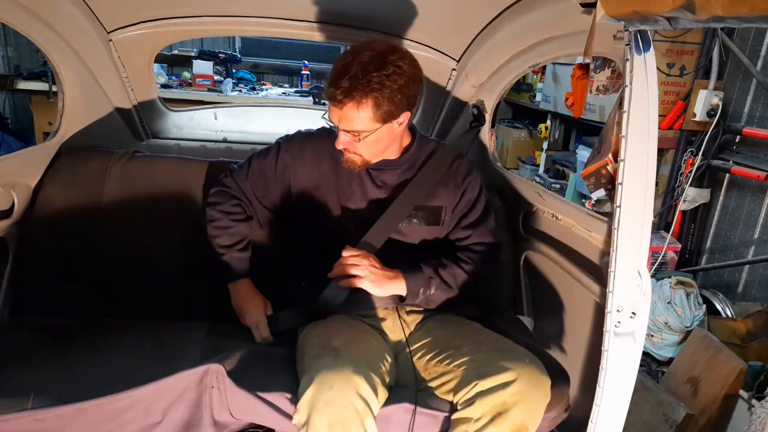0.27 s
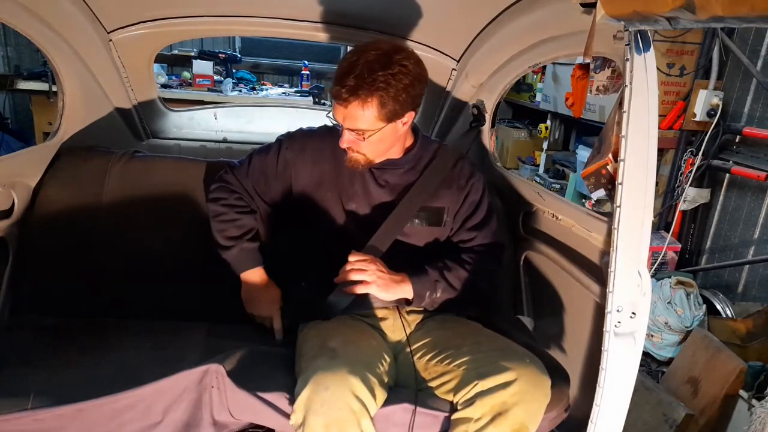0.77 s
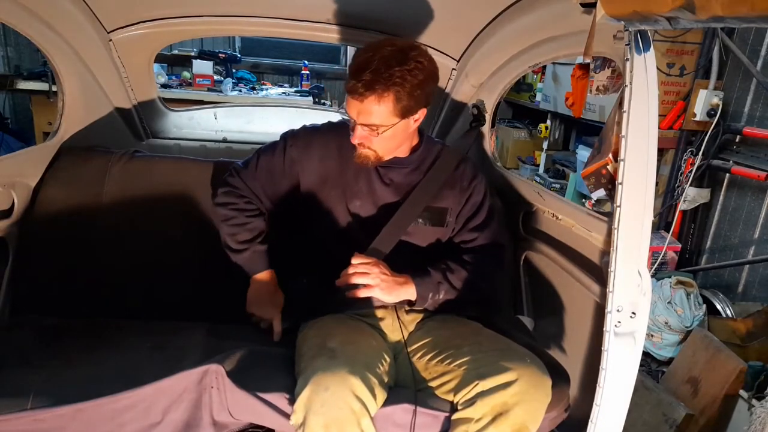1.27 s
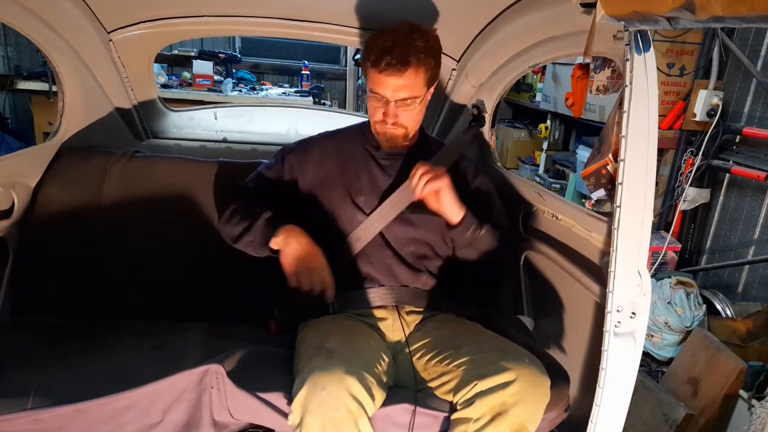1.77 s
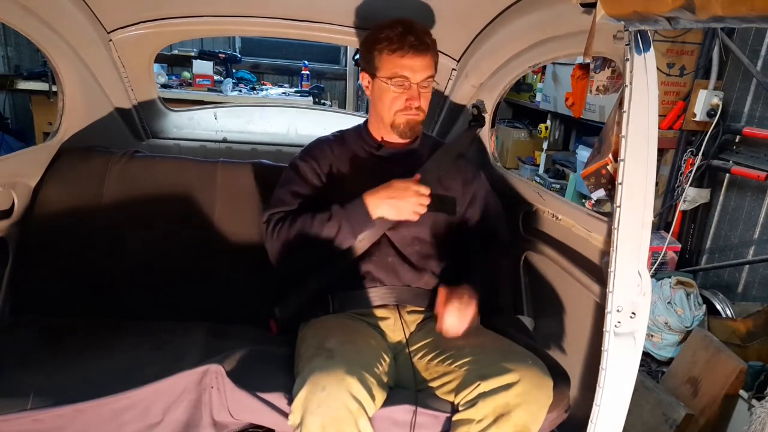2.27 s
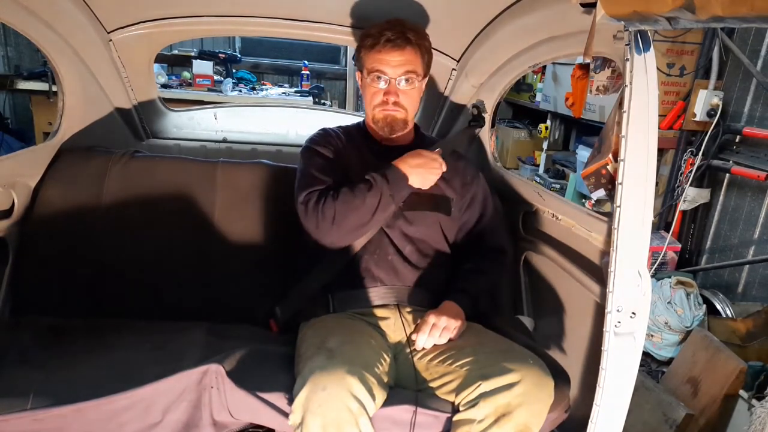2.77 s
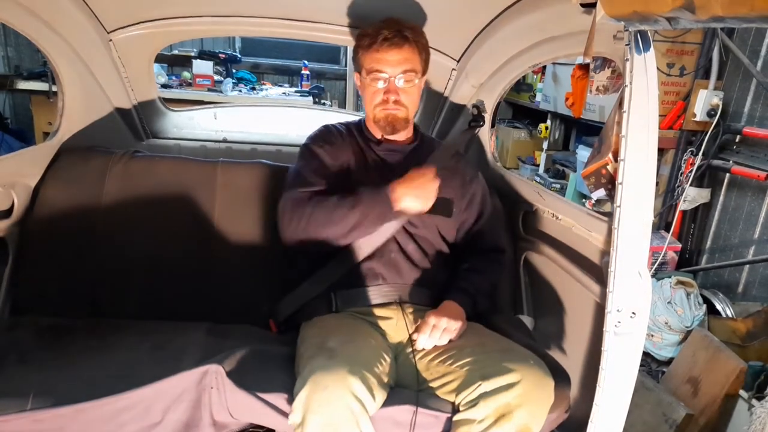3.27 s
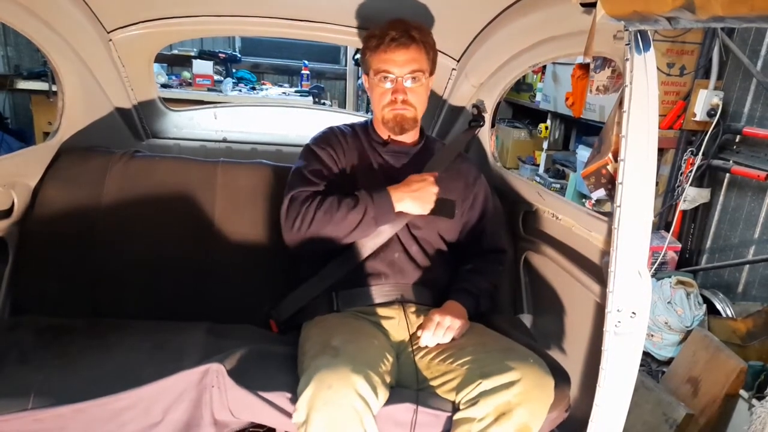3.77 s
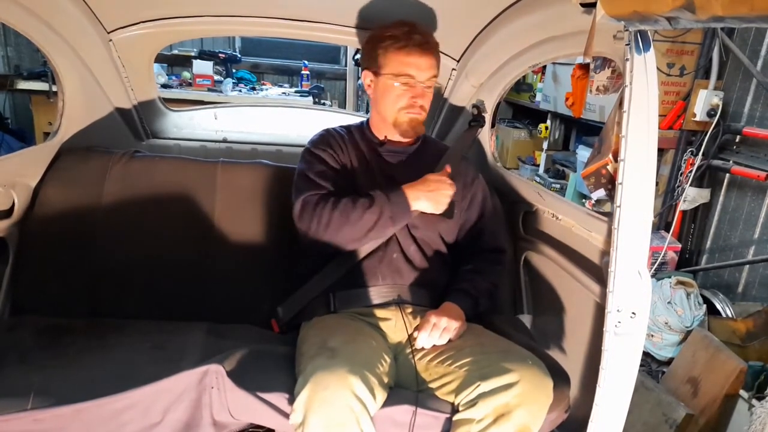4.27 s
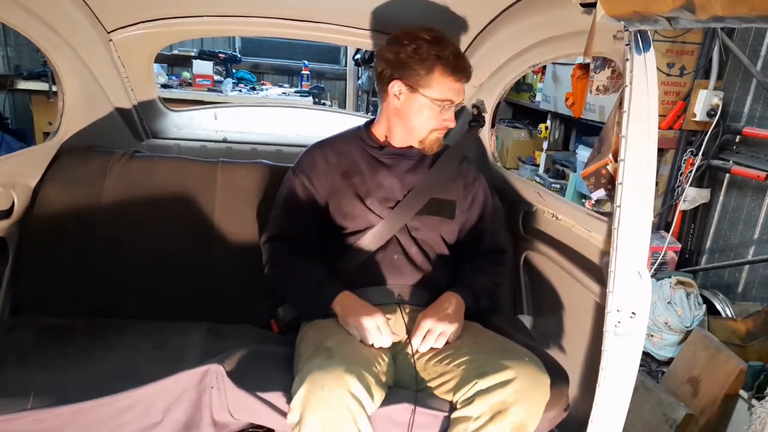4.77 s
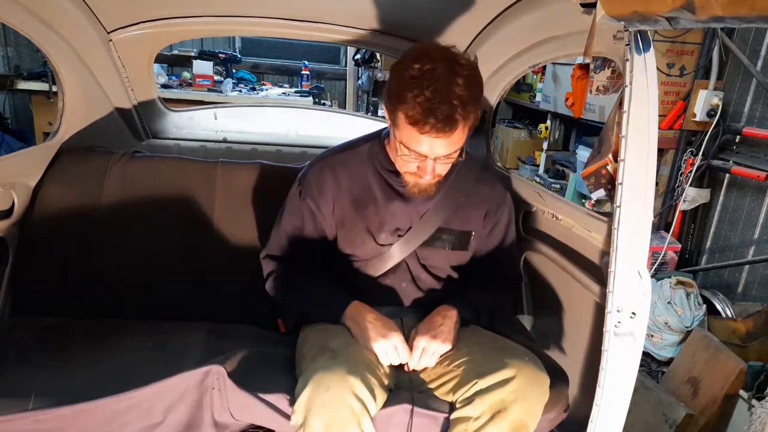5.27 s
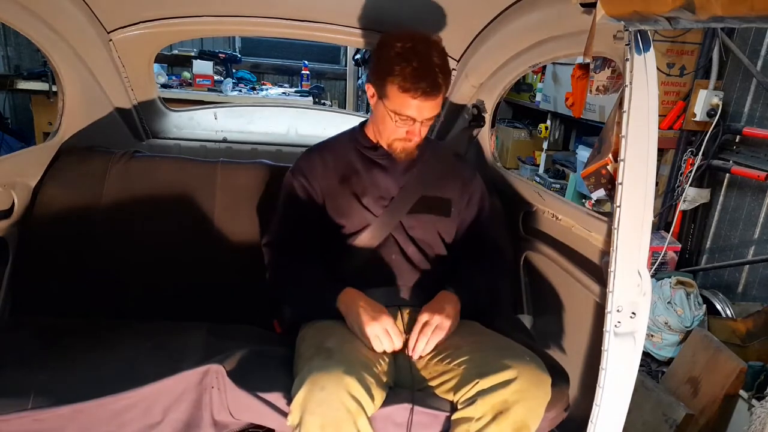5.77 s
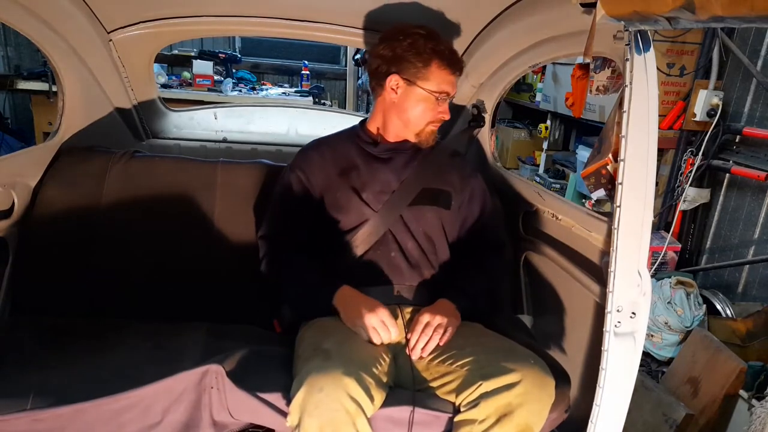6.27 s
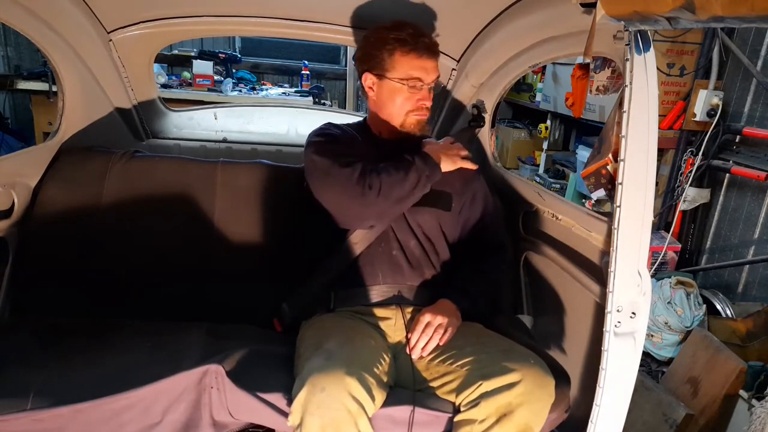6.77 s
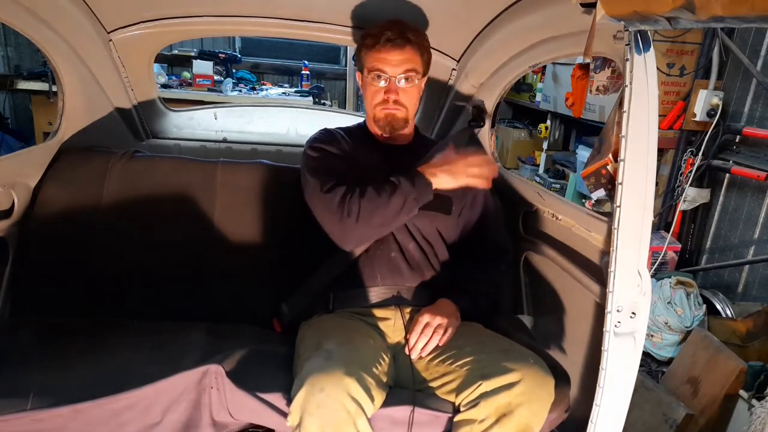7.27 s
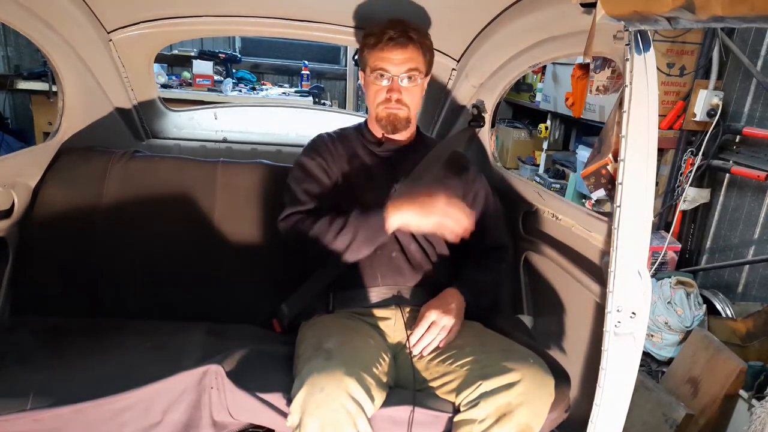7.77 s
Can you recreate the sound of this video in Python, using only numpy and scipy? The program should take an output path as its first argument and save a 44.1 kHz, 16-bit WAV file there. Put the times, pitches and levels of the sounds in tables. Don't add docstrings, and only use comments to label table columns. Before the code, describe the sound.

Seat belt latches with a click, webbing rasps, three hard reel locks clatter in a boomy cabin, soft rustling follows, then one hand slap.

```python
import sys
import numpy as np
from scipy import signal
from scipy.io import wavfile
from scipy.ndimage import uniform_filter1d

SR = 44100
rng = np.random.default_rng(int(sys.argv[2]) if len(sys.argv) > 2 else 0)


def volts(x):
    e = np.asarray(x, float) / 20
    return 10 ** e


def materialize(psi):
    bounded = np.clip(np.atleast_2d(psi).T, -1, 1)
    quanta = np.round(bounded * 32767).astype(np.int16)
    wavfile.write(sys.argv[1], SR, quanta)


N = 353549
CONTROL_STEP = 40

# band_hz, t60_s
CABIN_T60 = [(60, 1), (160, 0.71), (420, 0.54), (1100, 0.33), (2910, 0.27), (7680, 0.22), (14000, 0.12)]


def in_time(rows):
    s, *columns = np.transpose(rows)
    return [np.interp(np.arange(N) / SR, s, column) for column in columns]


def at_hz(points, hz):
    table_hz, values = np.transpose(points)
    return np.interp(np.log(hz), np.log(table_hz), values)


def rms_one(x):
    return x / np.sqrt(np.mean(x ** 2) + 1e-20)


def drift(rate_hz):
    r = np.exp(-2 * np.pi * rate_hz * CONTROL_STEP / SR)
    noise = rng.standard_normal(N // CONTROL_STEP + 2002)
    slow = signal.lfilter([1], [1, -2 * r, r * r], noise)[2000:]
    return np.interp(np.arange(N) / CONTROL_STEP, np.arange(len(slow)), rms_one(slow))


def ring(x, hz, t60_s):
    r, w = volts(-60 / (t60_s * SR)), 2 * np.pi * hz / SR
    return signal.lfilter([0, np.sin(w)], [1, -2 * r * np.cos(w), r * r], x + 1e-18)


def grains(per_s, spread_db):
    size_db = spread_db * np.minimum(rng.exponential(1, N), 5)
    sizes = volts(size_db) * rng.choice([-1, 1], N)
    return rms_one(sizes * (rng.random(N) < per_s / SR))


def bank(sources):
    edges_hz = 30 * 2 ** np.arange(0, 9.1, 1 / 3)
    for k, (low_hz, high_hz) in enumerate(zip(edges_hz, edges_hz[1:])):
        sos = signal.butter(2, [low_hz, high_hz], "band", fs=SR, output="sos")
        yield np.sqrt(low_hz * high_hz), signal.sosfilt(sos, sources[k % 2])


def shake(times_s, levels_db, lengths_s):
    rise_s = 0.0018
    power = np.zeros(N)
    for s, level_db, length_s in zip(times_s, levels_db, lengths_s):
        span_s = max(length_s, 0.002)
        u = np.arange(int(3 * span_s * SR)) / (span_s * SR)
        burst = volts(2 * level_db) * np.minimum(u * length_s / rise_s, 1) * np.exp(-u * u)
        i = round(s * SR)
        power[i:i + len(u)] += burst[:N - i]
    return power


def dying(power, t60_s, near):
    r = volts(-120 / (t60_s * SR))
    return np.sqrt(near * power + signal.lfilter([45 / SR], [1, -r], power + 1e-30))


def reel():
    # start_s, rattle_peak_db, boom_re_rattle_db, shake_length_s
    yanks = [
        (3.2195, -32, 6, 0.02),
        (3.229, -23, 4, 0.023),
        (3.594, -42, 10, 0.016),
        (3.6087, -26, 8.5, 0.017),
        (3.958, -35.5, -3, 0.025),
        (3.9719, -23.5, 10, 0.015),
    ]
    yank_bright_db = [-0.5, 0.7, -0.5, 0.7, -6, -3]
    # start_s, peak_db, boom_re_rattle_db, bright_re_rattle_db, run_on_db
    rattles = [(0.3, -58, 5, -65, 5), (0.915, -66, 31, -45, -2.5), (0.99, -49.5, 9.5, -73, 0),
               (1.108, -37, -1, -45, -12), (1.119, -26, -2, -52, -21), (1.3456, -45.5, 5, -70, 3),
               (2.833, -46.5, -6, -28, 6.5), (3.1192, -44, 12.5, -1, -14.5),
               (3.1694, -53.5, -14.5, 10.5, -6), (3.445, -48, -13, -25, -15), (3.4653, -30, -2, -6, -12),
               (3.8332, -32.5, 2, -3, -7.5), (4.221, -32.5, 0, -5, -10), (4.3094, -45.5, 6.5, -14, -24)]
    # freq_hz, density_db_per_hz
    bang = [(24, -39), (40, -25.5), (214, 1.5), (353, -14), (476, -2.5), (582, -16.5), (805, -14.5),
            (959, -17), (1470, -22.5), (1930, -33), (3990, -29), (6750, -38.5), (8040, -37.5),
            (13600, -45.5), (15800, -72.5)]
    # freq_hz, level_db
    loose_tilt = [(1000, 3), (2000, 10), (4000, 2), (9500, -2.5), (12000, -6.5), (15000, -14)]
    # freq_hz, width_hz, lift_db
    frame = [(1130, 110, 0), (1450, 79, -8), (2680, 310, 0.5), (3210, 370, 5), (4040, 190, 9.5),
             (4400, 68, -3), (5480, 300, 4.5), (7250, 250, 1.5), (8050, 630, 12), (9880, 390, 7.5)]
    # freq_hz, level_db, t60_s
    shell = [(111, 0, 1), (140.2, -5, 1), (167, -0.5, 0.57), (208, 2.5, 0.6), (240.1, 0, 0.58),
             (311.4, -4.5, 0.51), (387.3, -7, .35), (414.5, -6, 0.44), (483.2, 1, 0.44), (527, -15, 0.47),
             (677.5, -1.5, 0.42), (708, -0.5, 0.2), (788, -4, 0.42), (819, 2.5, 0.19), (910, -15.5, 0.33),
             (985, -17, .25), (1190, -16.5, 0.39), (1208, -17, .3), (1010, -20, 0.34), (1074, -13, 0.13),
             (1340, -9, 0.13), (1460, -22.5, 0.35), (1630, -16, 0.13), (4220, -37.5, 0.3)]

    yank_s, yank_db, yank_boom_db, yank_length_s = np.transpose(yanks)
    loose_s, loose_db, loose_boom_db, loose_bright_db, run_on_db = np.transpose(rattles)
    knock_s, run_on_s = np.full(len(rattles), 0.018), np.full(len(rattles), 0.069)
    end = 5 * SR
    chatter = []
    for side in range(2):
        mixed = 0.75 * rng.standard_normal(N) + 0.65 * grains(900, spread_db=3.0)
        chatter.append(mixed[:end])

    out = np.zeros(end)
    for hz, x in bank(chatter):
        t60_s = at_hz(CABIN_T60, hz)
        low = np.interp(np.log(hz), np.log([600, 2000]), [1, 0])
        high = np.clip(np.log2(hz / 2500), 0, 1)
        yank = np.array([yank_s, yank_db + high * np.array(yank_bright_db), yank_length_s])
        taut = shake(*yank[:, ::2])[:end]
        lock = shake(*yank[:, 1::2])[:end]
        level_db = loose_db + low * (loose_boom_db - 9) + high * (loose_bright_db + 11)
        level_db = level_db + at_hz(loose_tilt, hz) - 7
        loose = shake(loose_s, level_db, knock_s)
        loose += shake(loose_s, level_db + run_on_db, run_on_s)
        bang_env = volts(-2.5 * low) * dying(lock + volts(-14 * high) * taut, 1.11 * t60_s, near=1.0)
        loose_env = dying(loose[:end], 0.47 * t60_s, near=0.96)
        out += volts(at_hz(bang, hz) + 22.5) * x * (bang_env + loose_env)
    out += sum(volts(db - 8.5) * signal.lfilter(*signal.iirpeak(hz, hz / width_hz, SR), out)
               for hz, width_hz, db in frame)

    boom = shake(yank_s, yank_db + yank_boom_db, yank_length_s)
    loose_boom = shake(loose_s, loose_db + loose_boom_db, knock_s)
    fed_on = dying(boom, 0.37, near=0) ** 2
    drive = np.sqrt(boom + 0.42 * loose_boom + fed_on)[:end]
    for hz, db, t60_s in shell:
        out += volts(db - 39.0) * ring(drive * rng.standard_normal(end), hz, 0.47 * t60_s)
    return np.pad(out, (0, N - end))


def struck_parts():
    # start_s, peak_db, pitch_hz, t60_s
    struck = [(0.2823, -45, 1260, .05), (0.318, -40.5, 490, 0.11), (0.325, -46, 920, .08),
              (0.36, -44, 477, 0.092), (1.119, -42, 3400, .05), (0.922, -33, 112, .3),
              (3.635, -28, 152, .5), (3.98, -29, 389, .3), (4.2, -42, 205, .9), (1.1195, -38, 2050, 0.043),
              (1.122, -57.5, 4550, .08), (1.135, -44, 1745, 0.13), (1.165, -30.5, 515, 0.14),
              (3.2, -47, 900, .05), (3.12, -42, 680, 0.053), (3.234, -26, 687, .12),
              (3.277, -26.5, 818, 0.16), (3.61, -24, 1416, 0.13), (3.6095, -27, 1250, .06),
              (3.66, -27, 205, .5), (3.624, -28.5, 765, 0.16), (3.655, -32, 816, 0.22),
              (3.976, -25, 791, 0.12), (3.989, -31, 901, 0.21), (3.978, -20.5, 167, 0.58),
              (4.02, -27.5, 317, 0.29), (4.02, -28.5, 134.3, 0.5), (3.612, -24, 167, .6),
              (3.614, -25, 210, .5), (3.62, -31, 280, .3), (3.63, -34, 474, .2), (3.978, -22, 470, .25),
              (3.975, -25, 1160, .12), (4.02, -27, 571, .25), (3.833, -38, 2500, .08),
              (3.85, -40, 810, .25), (3.222, -30, 1100, .05), (3.24, -28, 108, .6), (4.222, -40, 2700, .06),
              (1.347, -44, 1300, .05), (2.2555, -45, 560, .04), (5.55, -48, 250, .2),
              (5.02, -43, 348, 0.18), (5.1, -49, 414, 0.11)]
    out, t = np.zeros(N), np.arange(SR // 2) / SR
    for s, db, hz, t60_s in struck:
        swell = 1 - np.exp(-t * hz / 1.2)
        tone = volts(db - 60 * t / t60_s) * swell * np.sin(2 * np.pi * hz * t)
        out[round(s * SR):][:len(t)] += tone
    return out


def slap():
    # start_s, peak_db, polarity
    contacts = [
        (7.4225, -44, 1),
        (7.4328, -34, 1),
        (7.4351, -27, -1),
        (7.4355, -13, -1),
        (7.4362, -15, 1),
        (7.4377, -22, 1),
        (7.4385, -23, -1),
    ]
    # freq_hz, level_db, t60_s
    palm = [(714, 1.5, 0.0046), (1470, 5.5, 0.0059), (2140, -6.5, 0.007), (2820, -2.5, 0.012),
            (3630, -13, 0.004), (5000, -10, 0.0025), (8800, -7, 0.0037), (10700, -11, 0.0036)]
    # freq_hz, level_db, t60_s
    chest = [(59.5, 2.5, 0.15), (124, -9.5, 0.92), (200, -24, 0.31), (245, -25, 0.57), (280, -11, 0.27),
             (323, -19, 0.34), (530, -28, 0.29), (595, -23, 0.29), (743, -32, 0.22)]
    # freq_hz, density_db_per_hz
    slap_tail = [(24, -38), (40, -30), (123, -5.5), (380, -14.5), (500, -19), (643, -17.5), (1290, -28),
                 (1540, -29), (5000, -39.5), (10300, -52.5), (15800, -58)]
    clicks, start = np.zeros(N), round(contacts[0][0] * SR)
    for s, db, polarity in contacts:
        clicks[round(s * SR)] = polarity * volts(db)
    padded = signal.lfilter([.16], [1, -1.2, .36], clicks)
    out = sum(volts(db - 1.5) * ring(padded, hz, t60_s) for hz, db, t60_s in palm)
    push = signal.lfilter([.05], [1, -.95], np.abs(clicks))
    for k, (hz, db, t60_s) in enumerate(chest):
        out += volts(db - 18.0) * ring(push, hz, t60_s) * (-1) ** k
    power = shake([7.437], [-8], [.008])[start:]
    for hz, x in bank(rng.standard_normal((2, N - start))):
        tail_env = dying(power, 0.79 * at_hz(CABIN_T60, hz), near=0.073)
        out[start:] += volts(at_hz(slap_tail, hz) + 13.5) * x * tail_env
    return out


def bumps():
    # start_s, peak_db, pitch_hz
    padded_knocks = [(0.314, -37, 443), (0.56, -55, 97), (0.781, -41.5, 90), (0.927, -32, 105),
                     (1.36, -27.5, 124), (1.485, -28, 204), (1.615, -26, 134), (2.877, -40, 350),
                     (4.528, -43, 62.2), (4.817, -28, 87), (5.064, -36, 110), (5.542, -32.5, 168),
                     (6.808, -49, 167), (2.113, -42, 75), (2.24, -54, 52), (2.55, -54, 46), (6.33, -48, 62),
                     (6.5, -50, 55), (6.664, -42, 50), (6.578, -45, 72), (6.62, -52, 300),
                     (5.7778, -29.5, 320),
        (6.815, -40, 360),
        (5.811, -35.5, 620),
        (7.421, -22.5, 108),
    ]
    out, t = np.zeros(N), np.arange(int(.2 * SR)) / SR
    for s, db, hz in padded_knocks:
        i, cycles = round(s * SR), t * hz
        out[i:i + len(t)] += volts(db + 1.5) * cycles * np.exp(-cycles / 0.8) * np.sin(2 * np.pi * cycles)
    return out


def ticks():
    # start_s, peak_db, pitch_hz
    small_ticks = [ (4.326, -43, 2600), (1.12, -32, 1500), (1.347, -41.5, 1480), (1.622, -40, 3120),
                   (2.088, -48, 1900), (2.262, -52, 1500), (2.328, -61, 1760), (2.375, -49, 1450),
                   (4.512, -53, 1450), (4.883, -48, 2040), (4.9456, -57, 1570), (5.074, -46.5, 1740),
                   (5.1537, -51, 1340), (5.779, -48, 2140), (5.845, -44, 1770)]
    out, t = np.zeros(N), np.arange(int(0.023 * SR)) / SR
    for s, db, hz in small_ticks:
        i, noise = round(s * SR), rng.standard_normal(len(t))
        tone = ring(noise * np.exp(-t / 0.0068), hz, 4.7 / hz)
        crack = np.diff(noise, prepend=0) * np.exp(-t / 0.0032)
        out[i:i + len(t)] += volts(db - 1.0) * (tone / np.abs(tone).max() + .03 * crack)
    return out


def snaps():
    # start_s, level_db, pitch_hz, length_s
    scrapes = [(1.119, -50, 3270, 0.0049), (3.609, -30.5, 1380, 0.054), (3.232, -43, 7950, .04),
               (3.61, -45, 7900, .02), (3.972, -38, 4230, .03), (4.01, -48, 4300, .04),
               (1.35, -53, 1600, .07), (7.11, -64, 4200, .04), (3.985, -26, 1100, 0.028),
               (4.883, -54.5, 7900, 0.023), (5.153, -67, 8000, 0.026), (7.989, -65, 3900, 0.023),
               (7.985, -69, 6300, .02), (1.01, -56, 1400, .04), (1.13, -52, 1600, .07),
               (1.14, -56, 2600, .07), (1.35, -72, 7600, .04), (1.68, -76, 12800, .04),
               (5.2, -67, 2400, .06), (5.3, -74, 3300, .2), (5.6, -74, 3200, .1), (1.88, -70, 3000, .08),
               (1.125, -66, 11800, .035), (6.52, -68, 4200, .12), (7.59, -66, 4000, .07),
               (0.106, -74, 2020, .15), (0.3, -72, 2080, 0.083), (0.462, -69.5, 2030, 0.11),
               (0.097, -65, 1200, .15), (0.377, -62, 1150, 0.27)]
    spring_band = signal.butter(3, [5200, 13000], "band", fs=SR, output="sos")
    spring = signal.sosfilt(spring_band, rng.standard_normal(N))
    out = spring * dying(shake([1.1192], [-56.5], [.02]), 0.081, near=1.0)
    noise = rng.standard_normal(N)
    for s, db, hz, length_s in scrapes:
        part = slice(round(s * SR), round((s + 3 * length_s + .05) * SR))
        envelope = np.sqrt(shake([s], [db + 10.5], [length_s])[part] + 1e-24)
        peak = signal.iirpeak(hz, 5.5, SR)
        out[part] += signal.lfilter(*peak, signal.lfilter(*peak, envelope * noise[part]))
    return out


def drag():
    # time_s, quarter_slips_per_s, level_db
    pull = [(1.4, 40, -96), (1.44, 110, -63), (1.54, 140, -62), (1.56, 42, -76), (1.63, 63, -65),
            (1.72, 134, -62), (1.8, 96, -63), (1.86, 81, -67), (1.92, 72, -92)]
    # start_s, level_db, length_s
    weave_catches = [(1.423, -61, .01), (1.4482, -57, .006), (1.456, -50, .007), (1.488, -55, .008),
                     (1.5, -55, .008), (1.52, -52, .008), (1.529, -54, 0.0046), (1.57, -54, .008),
                     (1.589, -47, 0.0062), (1.621, -50, 0.0064), (1.687, -53, .008), (1.693, -53, .01),
                     (1.761, -57, .012), (1.82, -58.5, .02)]
    # freq_hz, level_db, t60_s
    slot = [(1710, -2.5, 0.03), (2080, 8.5, 0.0081), (2770, 12, 0.0042), (3060, 1, 0.0078), (3700, 3, .005)]
    per_s, level_db = in_time(pull)
    slips = volts(3.0 * rng.standard_normal(N)) * (rng.random(N) < 4 * per_s / SR)
    weave = rng.standard_normal(N)
    slip_bursts = rms_one(signal.lfilter([1], [1, -.99], slips + 1e-12) * weave)
    catch_bursts = np.sqrt(shake(*np.transpose(weave_catches)) + 1e-24) * weave
    soft = signal.butter(8, 4200, fs=SR, output="sos")
    bursts = signal.sosfilt(soft, [slip_bursts, catch_bursts])
    steady, catches = sum(volts(db) * ring(bursts, hz, t60_s) for hz, db, t60_s in slot)
    return (volts(level_db - 5) * steady + volts(3) * catches) / np.std(steady)


def threads():
    # start_s, peak_db, lowest_hz
    snapping_threads = [(1.543, -55, 6000), (1.582, -51, 7000), (1.603, -59, 8000), (1.63, -57, 5000),
                        (1.645, -60, 6000), (1.702, -49, 8000), (4.327, -47, 1500), (1.247, -60, 6000),
                        (1.347, -50, 3500), (1.355, -56, 9000), (2.088, -54, 1500), (5.672, -60, 7000),
                        (5.7165, -53, 7000), (5.758, -58, 6000), (5.781, -46, 2500), (5.812, -53, 4000),
                        (5.848, -50, 5000),
                        (4.8683, -54, 7000),
        (4.8852, -50, 7000),
        (4.9456, -50, 3000),
        (5.1566, -55, 4000),
        (5.2948, -57, 6000),
    ]
    out, t = np.zeros(N), np.arange(300) / SR
    for s, db, hz in snapping_threads:
        click = rng.standard_normal(len(t)) * np.exp(-t / 0.00094)
        click = signal.sosfilt(signal.butter(2, hz, "high", fs=SR, output="sos"), click)
        click = signal.lfilter([1], [1, -.6], click)
        out[round(s * SR):][:len(t)] += volts(db - 4.0) * click / np.abs(click).max()
    return out


def flick():
    # start_s, peak_db, polarity
    nail_hits = [
        (7.981, -54, 1),
        (7.9834, -46, 1),
        (7.9838, -46, -1),
        (7.985, -37.5, -1),
        (7.9864, -39, -1),
        (7.9868, -45, 1),
    ]
    # freq_hz, level_db, t60_s
    nail_modes = [(850, -10, .008), (1700, -9, .004), (2700, -8, .003), (3800, -4, .005), (6200, -14, .004)]
    start = round(nail_hits[0][0] * SR)
    clicks = np.zeros(N - start)
    for s, db, polarity in nail_hits:
        clicks[round(s * SR) - start] = polarity * volts(db)
    clicks = signal.lfilter([.5], [1, -.5], clicks)
    pulses = signal.lfilter([.3, 0, 0, -.1], [1, -1.3, .42], clicks + 1e-18)
    nail = sum(volts(db) * ring(clicks, hz, t60_s) for hz, db, t60_s in nail_modes)
    return np.pad(volts(6.0) * pulses + nail, (start, 0))


def springs():
    start_s, crest_s, end_s = 5.9, 6.035, 6.95
    pitch_hz, throbs_per_s, level_db = 106, 6.2, -53
    t = np.arange(N) / SR - crest_s
    gate = in_time([(start_s, 0), (crest_s, 1), (end_s - .2, 1), (end_s, 0)])[0]
    beat = np.cos(np.pi * throbs_per_s * t) ** 2
    return volts(level_db + 1.5 * drift(6)) * gate * beat * np.sin(2 * np.pi * pitch_hz * t)


def swells(s, length_s, db, rest_db, rise, bend):
    fade_db = 10
    t = np.arange(N // CONTROL_STEP + 1) * CONTROL_STEP / SR
    power = volts(2 * rest_db) + np.zeros(len(t))
    for peak_s, span_s, peak_db in zip(s, length_s, db):
        away = np.abs(t - peak_s) / (span_s * np.where(t < peak_s, rise, 1))
        power = power + volts(2 * np.maximum(peak_db - fade_db * away ** bend, -200))
    return np.interp(np.arange(N) / SR, t, 10 * np.log10(power))


def movements():
    # time_s, rumble_db
    restless = [(0, -63.5), (.62, -59.5), (0.698, -76), (.9, -76), (.96, -50), (1.8, -54), (2.05, -60),
                (2.5, -73), (2.88, -63), (3.0, -48), (4.3, -45), (4.6, -51.5), (5.8, -57), (6.3, -64),
                (6.751, -57), (7.36, -64.5), (7.5, -58.5), (8.02, -61)]
    # peak_s, length_s, rumble_db, creak_re_rumble_db
    shifts = [(0, 0.05, -43, -9), (.12, 0.19, -62, 3.5), (0.307, 0.11, -59.5, 11.5), (0.567, 0.12, -62, 2),
              (0.781, 0.091, -53.5, -7), (0.943, 0.11, -48.5, 2.5), (1.15, 0.071, -42.5, 8.5),
              (1.35, 0.15, -56, 4), (1.48, 0.14, -44.5, -9.5), (1.609, 0.23, -50, -3.5), (2.376, 1, -71, 7),
              (2.9, 0.13, -52.5, -1.5), (3.143, 0.2, -44, -10), (3.644, 0.15, -39, -7.5),
              (4.06, 0.059, -37, -2), (4.15, 0.13, -37.5, -25), (4.957, 0.32, -49, -4.5),
              (5.613, 0.37, -51, -9.5), (6.55, 0.74, -67, 2.5), (6.82, 0.11, -56.5, -3.5),
              (7.55, 0.072, -66, -2)]
    # peak_s, length_s, rub_db, hiss_re_rub_db
    strokes = [(0, 0.047, -68.5, -9.5), (.535, 0.016, -78.5, -1), (1.374, 0.046, -77, 0),
               (1.54, 0.083, -63.5, -2.5), (1.673, 0.14, -56, -2.5), (1.937, 0.14, -67.5, -10.5),
               (2.37, 0.14, -67.5, -12.5), (2.526, 0.064, -60.5, -12.5), (2.696, 0.1, -60.5, -6),
               (2.922, 0.055, -57.5, -2.5), (3.174, 0.092, -54, -6), (3.524, 0.055, -59.5, -1.5),
               (3.923, 0.052, -70, -10.5), (4.31, 0.03, -55.5, -1.5), (4.43, 0.13, -66, -8.5),
               (4.584, 0.042, -64.5, -12.5), (4.902, 0.11, -57.5, -9), (5.023, 0.15, -66.5, -3.5),
               (5.364, 0.088, -69.5, -0.5), (5.545, 0.24, -71.5, -9), (5.738, 0.11, -67, -6),
               (5.834, 0.079, -57, -7.5), (6.55, .055, -59, 2), (6.62, .095, -55.5, -2),
               (6.89, 0.076, -56, -17), (7.095, .04, -61, -4), (7.143, 0.038, -56.5, -1.5),
               (7.637, 0.07, -61.5, -4), (7.968, 0.14, -73.5, -13)]
    # peak_s, length_s, level_db
    rubs = [(0.132, 0.22, -75), (0.516, 0.25, -76.5), (1.033, 0.045, -87), (1.194, 0.26, -73),
            (2.1, 0.015, -55), (2.228, 0.099, -70), (2.843, 0.032, -61), (3.364, 0.026, -47.5),
            (3.712, 0.11, -67), (3.825, 0.012, -50.5), (3.967, 0.015, -39.5), (4.216, 0.041, -57),
            (4.519, 0.018, -59.5), (4.685, .08, -69), (6.76, .05, -68), (5.16, 0.07, -65),
            (6.01, 0.19, -71), (6.148, 0.049, -61), (6.301, 0.021, -71), (7.063, 0.089, -62),
            (7.527, 0.041, -61), (7.84, 0.086, -68)]
    seat_shape = dict(rise=0.29, bend=1.62)
    cloth_shape = dict(rise=1.123, bend=1.79)

    t = np.arange(N // CONTROL_STEP + 1) * CONTROL_STEP / SR
    rumble_rest_db = np.interp(t, *np.transpose(restless))
    creak_rest_db = -65.5 + 0.49 * (rumble_rest_db + 56)
    s, length_s, db, creak_db = np.transpose(shifts)
    rumble = swells(s, length_s, db, rumble_rest_db, **seat_shape)
    creak = swells(s, length_s, db + creak_db, creak_rest_db, **seat_shape)

    dull_rubs = [(*row, -24.5) for row in rubs]
    s, length_s, db, hiss_db = np.transpose(strokes + dull_rubs)
    rub = swells(s, length_s, db, -93, **cloth_shape)
    hiss = swells(s, length_s / 1.146, db + hiss_db, -102, **cloth_shape)
    return np.array([rumble, creak, rub, hiss])


def rustle():
    # freq_hz, density_db_per_hz
    colour = [(18, -42), (30, -13.5), (48, -2), (93, 1), (220, -7), (258, -4.5), (301, -14.5), (353, -9),
              (447, -11), (680, -12.5), (1660, -20), (3540, -26.5), (4610, -39.5), (7990, -42),
              (15800, -75.5)]
    layer_edges_hz, layer_mids_hz = (300, 1500, 4500), (150, 900, 2800, 6500)
    levels_db, together = movements(), drift(27)
    fibres = [rng.standard_normal(N) + 0.32 * grains(2500, spread_db=1.5) for side in range(2)]
    slices, power = [], np.zeros(4)
    for hz, x in bank(fibres):
        flicker_db = 1.2 * together + 1.5 * drift(14)
        x = volts(at_hz(colour, hz) + flicker_db) * x
        slices.append((hz, x))
        power[np.searchsorted(layer_edges_hz, hz)] += np.mean(x ** 2)
    gains_db = levels_db - 10 * np.log10(power)[:, None]
    out = np.zeros(N)
    for hz, x in slices:
        share = [np.interp(np.log(hz), np.log(layer_mids_hz), row) for row in np.eye(4)]
        out += volts(np.dot(share, gains_db)) * x
    return out


def suppress(x):
    # freq_hz, level_db
    gate_db = [(300, -104), (1500, -102.5), (2500, -91), (4500, -99), (7000, -104), (12000, -105)]
    f, t, spectra = signal.stft(x, SR, nperseg=512)
    power = uniform_filter1d(np.abs(spectra) ** 2, size=7, axis=-1)
    power = uniform_filter1d(power, size=5, axis=-2)
    over = np.abs(power) / volts(2 * at_hz(gate_db, f + 1))[:, None]
    gain = np.maximum(over ** 1.502 / (1 + over ** 1.4992), volts(-29))
    return signal.istft(spectra * gain, SR, nperseg=512)[1][:, :N]


def scene():
    belt = reel() + struck_parts() + snaps() + drag() + threads()
    body = slap() + bumps() + ticks() + flick() + springs() + rustle()
    return (belt + body)[None]


def low_pass(x):
    return signal.sosfilt(signal.butter(12, 15980, fs=SR, output="sos"), x)


def record(dry):
    cut = signal.sosfilt(signal.butter(4, 42, "high", fs=SR, output="sos"), dry)
    cut = signal.sosfilt(signal.ellip(10, .5, 50, 15450, fs=SR, output="sos"), cut)
    hiss = volts(-85) * signal.lfilter([1], [1, -.35], rng.standard_normal(N))
    return low_pass(suppress(cut) + hiss)


dry = scene()
out = record(dry)
materialize(out)
```